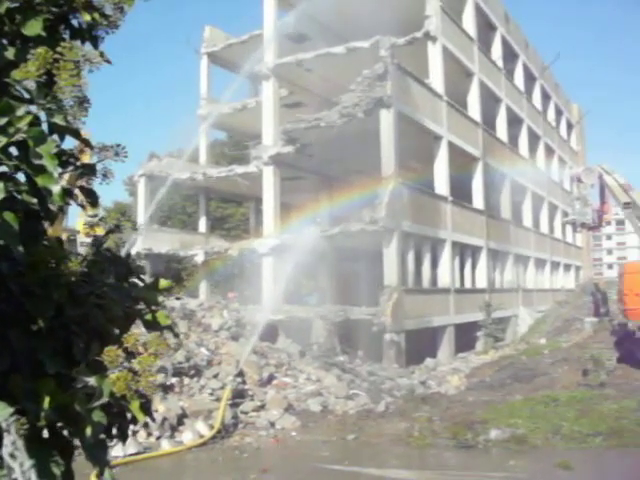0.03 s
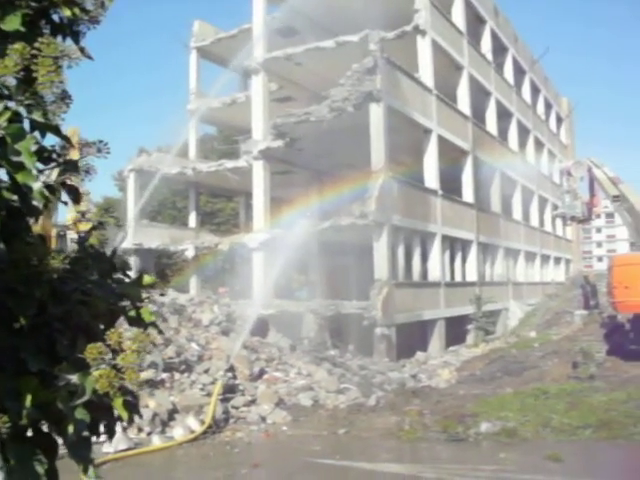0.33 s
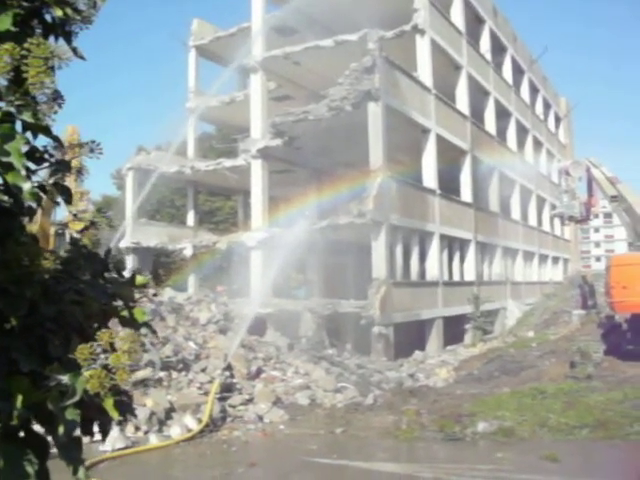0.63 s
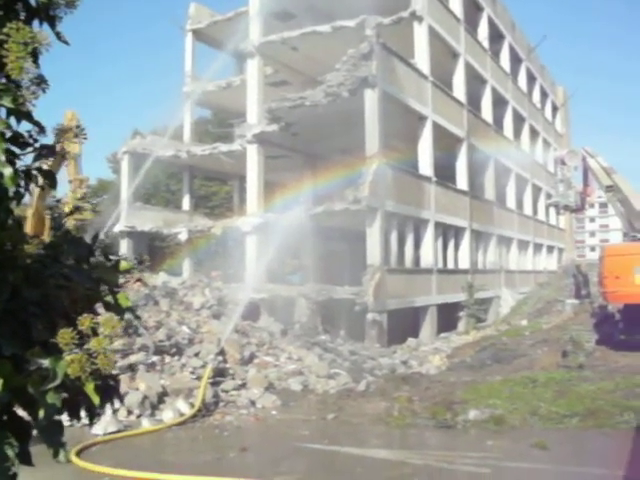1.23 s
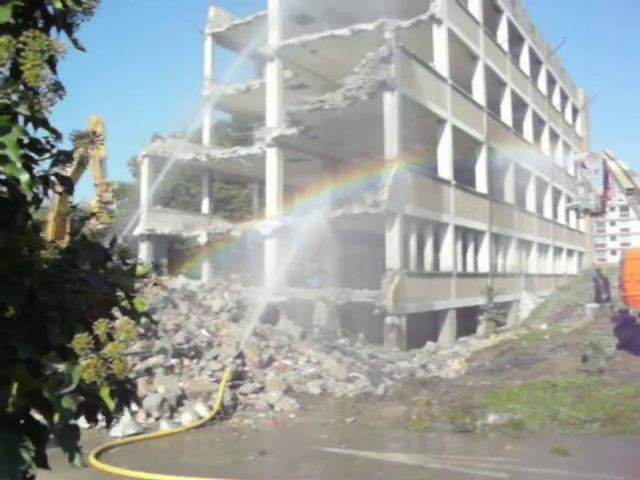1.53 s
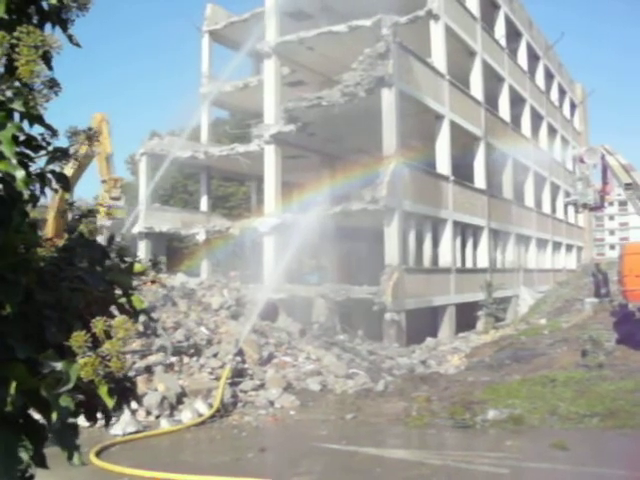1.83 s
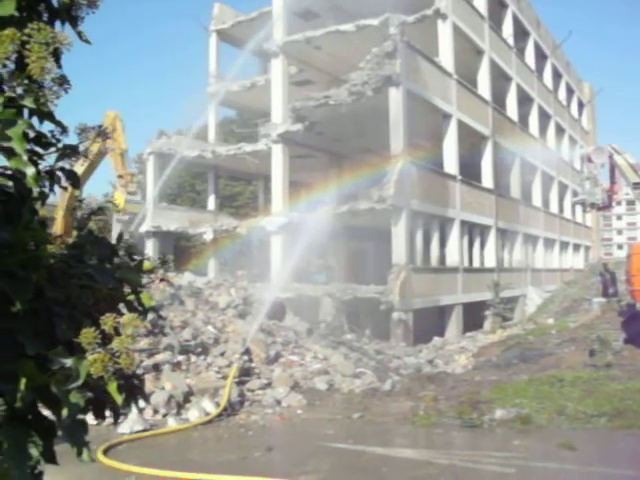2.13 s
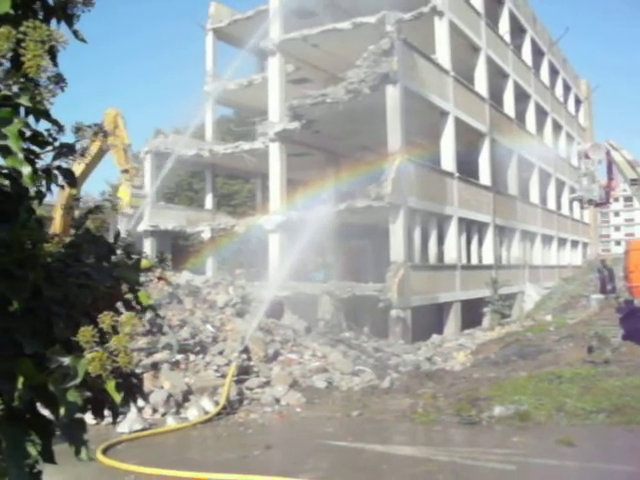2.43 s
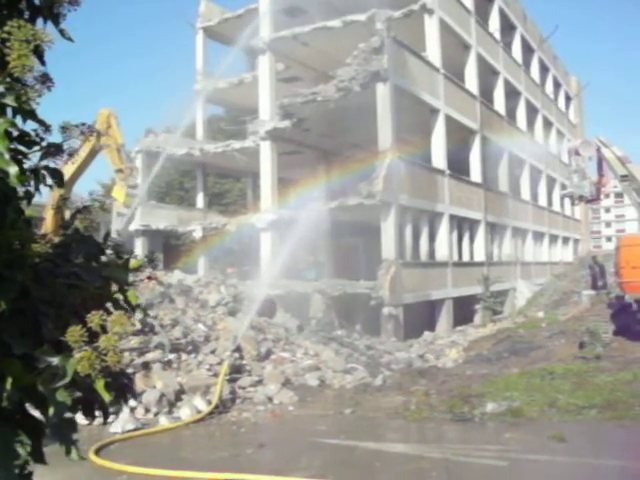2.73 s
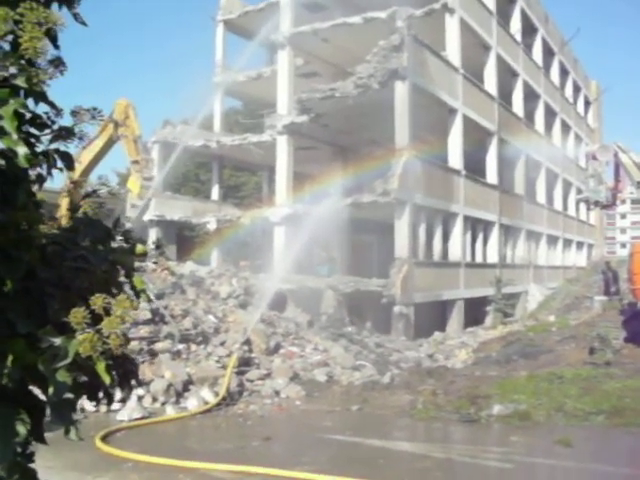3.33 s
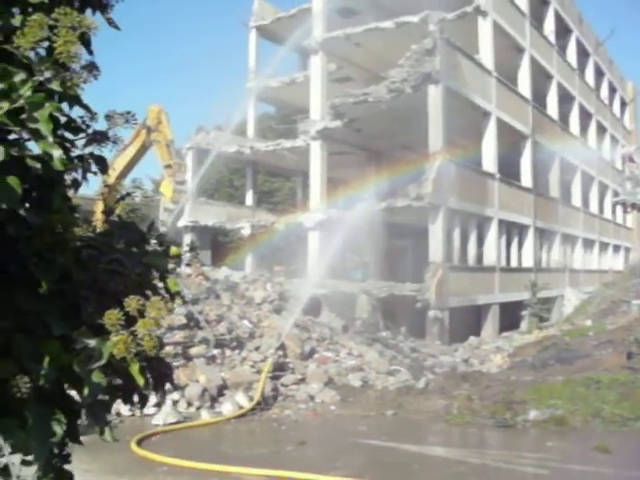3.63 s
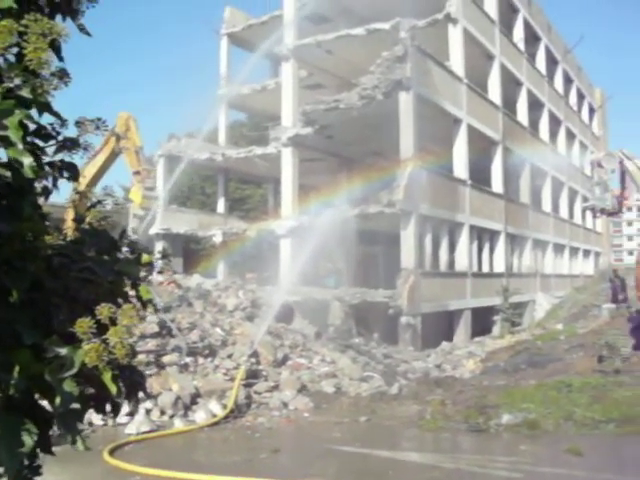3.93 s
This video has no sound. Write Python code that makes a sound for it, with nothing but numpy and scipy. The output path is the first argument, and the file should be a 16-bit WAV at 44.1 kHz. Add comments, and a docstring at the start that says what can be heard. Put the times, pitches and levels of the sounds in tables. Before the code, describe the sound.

Steel demolition jaws grind through concrete from about 0.5 to 1.4 seconds, in quick bites with metallic squeals and crunching rubble. The excavator's diesel sags and swells under load, then one more squealing bite comes around 2.6 seconds. The gutted building echoes each bite. Idling engines clatter and a distant hose hisses throughout, until 4 seconds. The sound is dull and overloads slightly on the loudest grinding.

```python
"""Steel jaws grind and squeal through concrete, in a run of bites and then one more, rubble crunching after.
Dense fractures ring the steel, which sticks and slips; the excavator's diesel sags and swells under load.
Behind it two other engines idle and a hose sprays. The gutted building echoes the bites and squeals.
It all comes through a narrow-band recorder that overloads on the loudest grinding."""
import sys
import numpy as np
from scipy import signal
from scipy.fft import rfft, irfft
from scipy.io import wavfile
from scipy.ndimage import uniform_filter1d, map_coordinates

SR = 44100
rng = np.random.default_rng(int(sys.argv[2]) if len(sys.argv) > 2 else 0)


def dump(signal):
    """Clip the signal to [-1, 1] and save it as 16-bit WAV at the path in sys.argv[1]."""
    limited = np.clip(np.atleast_2d(signal).T, -1, 1)
    pcm = np.round(limited * 32767).astype(np.int16)
    wavfile.write(sys.argv[1], SR, pcm)


N = 176400

# Bites: peak t/s, rise/s, level/dB, 60 dB decay/s, crunch send/dB, thud send/dB
BITES = [(.53, 0.073, -14, 3.04, -5.5, -11.5), (.75, 0.048, -11.5, 1.2, -14, -10.5),
         (0.832, .05, -3.5, 0.37, -7.5, -13), (.89, 0.081, -6.5, 0.84, -9.5, -14),
         (0.991, 0.06, -8, 0.47, -10, -8.5), (1.138, 0.11, -4, 0.88, -8, -11),
         (2.595, 0.14, -2.5, 0.73, -8.5, -17)]
# EQs for the grinding body, the crunch of small pieces and the thud of lumps: f/Hz, relative level/dB
GRIND_EQ = [(30, -19.5), (80, -19.5), (130, -4.5), (210, -12), (330, 0), (520, -7), (680, -4.5), (900, -3),
            (1130, 3), (1300, -4.5), (1550, -8), (2000, -21.5), (4000, -41.5)]
CRUNCH_EQ = [(600, -3), (1500, 4), (2100, 5), (2500, -2.5), (3000, 0.5), (3600, -11), (4200, -12.5)]
THUD_EQ = [(60, -18), (130, 0.5), (190, 0), (260, -4.5), (380, -1.5), (520, 2.5), (640, -12), (1000, -26.5),
           (3000, -47.5)]
# Ring of the steel jaws and boom: f/Hz, width/Hz, relative level/dB
STEEL_MODES = [(490, 32, -6.5), (555, 29, -10), (986.3, 6.3, 1), (1102, 27, -3.5), (1242, 17, 2),
               (1432, 90, -9.5), (1585, 14, -6), (1990, 31, -6.5), (2190, 39, -17.5), (3460, 38, -18),
               (3410, 90, -20.5)]


def jaws(steel_db=-11.5):
    """Each bite builds and dies away: concrete grinds and crunches, lumps thud, the steel rings."""
    t = np.arange(N) / SR
    grind_power = crunch_power = thud_power = 0
    for peak, rise, db, t60, crunch_db, thud_db in BITES:
        attack = np.clip(1 + (t - peak) / rise, 0, 1)
        decay = np.exp(-np.log(1000) * np.maximum(t - peak, 0) / t60)
        force = undb(db) * attack * decay
        grind_power += force ** 2
        crunch_power += (force * undb(crunch_db)) ** 2
        thud_power += (force * undb(thud_db)) ** 2
    grind = colour(fractures(), GRIND_EQ) + undb(steel_db) * ring(fractures(), STEEL_MODES)
    crunch = colour(fractures(), CRUNCH_EQ)
    thud = colour(fractures(), THUD_EQ)
    return np.sqrt(grind_power) * grind + np.sqrt(crunch_power) * crunch + np.sqrt(thud_power) * thud


def fractures(per_second=2500, spread_db=4):
    """Concrete cracks in dense random clicks of uneven size."""
    clicks = (rng.random(N) < per_second / SR) * rng.standard_normal(N)
    return clicks * undb(spread_db * rng.standard_normal(N))


# Squeals and groans: start t/s, length/s, first f/Hz, last f/Hz, level/dB
SQUEALS = [(0.527, 0.15, 1275, 1272, -22.5), (0.543, 0.34, 495.4, 489.3, -22.5),
           (0.792, 0.18, 1244, 1278, -11), (0.817, .24, 1408, 1411, -19), (0.784, 0.3, 2025, 2020, -24.5),
           (0.793, 0.29, 1591, 1602, -22.5), (0.961, 0.29, 1280, 1243, -12.5),
           (1.111, 0.33, 542, 527.8, -19.5), (2.494, .23, 1148, 1144, -14.5), (2.5, .17, 1000, 1002, -19),
           (2.512, .22, 2006, 2020, -26), (2.497, .55, 2643, 2607, -32), (2.534, 0.14, 3575, 3548, -24),
           (2.543, 0.13, 318, 300.3, -12.5), (2.632, .11, 266.6, 255, -15)]


def squeals(waver=0.00549):
    """Steel sticks and slips on concrete in short, unsteady gliding tones."""
    t, out = np.arange(N) / SR, 0
    for start, length, first_hz, last_hz, db in SQUEALS:
        progress = np.clip((t - start) / length, 0, 1)
        glide_hz = first_hz + (last_hz - first_hz) * progress
        phase = turn(glide_hz * (1 + waver * drift(90)))
        out += np.sin(np.pi * progress) * tone(phase, db + 2.8 * drift(50))
    return out


# Exhaust note: t/s, firing f/Hz, level/dB
EXHAUST = [(0, 96.5, -33), (.5, 93.3, -36.5), (.85, 92.9, -24.5), (1.15, 92.2, -28), (1.31, 90.5, -23),
           (1.5, 85.5, -32.5), (1.66, 86, -36), (1.85, 87.4, -22), (2.0, 89.5, -27.5), (2.3, 91.6, -21.5),
           (2.46, 91, -23.5), (2.6, 92, -32.5), (3.0, 95.3, -34), (4, 94.2, -35)]
# Upper engine hum: t/s, f/Hz, level/dB
UPPER_HUM = [(0, 289, -26), (.4, 286.3, -32), (.8, 285, -40), (1.7, 279.8, -35.5), (2.35, 283.4, -32.5),
             (2.85, 288.2, -29), (3.3, 285.4, -30.5), (4, 284, -27)]


def excavator():
    """The exhaust note drops and swells under load; a higher engine tone near 285 Hz wavers above it."""
    firing_hz = curve(EXHAUST, 1) * (1 + 0.0027 * drift(12))
    exhaust = tone(turn(firing_hz), curve(EXHAUST, 2) + 0.32 * drift(21))
    upper_hz = curve(UPPER_HUM, 1) * (1 + 0.0069 * drift(30))
    upper_hum = tone(turn(upper_hz), curve(UPPER_HUM, 2) + 1.3 * drift(15))
    return exhaust + upper_hum


# Hum of the near and the far engine: multiple of the engine's rate, level/dB
NEAR_ORDERS = [(1, -30.5), (2, -34), (3, -43.5), (19, -38), (38, -42.5)]
FAR_ORDERS = [(7, -40), (8, -40), (9, -43.5), (12, -40.5)]
# EQ of the machinery clatter: f/Hz, relative level/dB
CLATTER_EQ = [(25, -23.5), (60, -2.5), (130, -6.5), (220, -8.5), (330, -2.5), (440, -7.5), (620, -7),
              (820, -2), (950, -6), (1150, -1.5), (1400, -4.5), (1700, -12), (1920, -10), (2300, -20.5),
              (4000, -33)]
# Ringing machine panels: f/Hz, width/Hz, level/dB
PANEL_MODES = [(587, 30, -40), (784, 28, -37.5), (878.6, 47, -31), (1068, 11, -32), (1155, 10, -28),
               (1249, 16, -32)]


def idling_engines(clatter_db=-19.5, throb=0.11, near_rattle_db=-11, far_rattle_db=-5.5):
    """A bed of two humming engines: clatter throbs with the near one's firings, and panels ring."""
    near_hum, near_rattle, firing_phase = engine(hz=37.72, orders=NEAR_ORDERS)
    far_hum, far_rattle, _ = engine(hz=15.8, orders=FAR_ORDERS)
    knocks = rng.standard_normal(N) * (1 + throb * np.cos(firing_phase))
    knocks += undb(near_rattle_db) * near_rattle + undb(far_rattle_db) * far_rattle
    clatter = colour(knocks * undb(0.5 * drift(9)), CLATTER_EQ)
    panels = ring(rng.standard_normal(N), PANEL_MODES)
    return near_hum + far_hum + undb(clatter_db) * clatter + panels


def engine(hz, orders):
    """A steady engine: the hum of its orders, a rattle that loops every cycle, and its phase."""
    phase = turn(hz * (1 + 0.002005 * drift(5)))
    hum = sum(tone(k * phase + 2 * np.pi * rng.random(), db + drift(4.2)) for k, db in orders)
    loop = rng.standard_normal(N)[:int(SR / hz)]
    position = phase / (2 * np.pi) * len(loop)
    rattle = map_coordinates(loop, [position], order=1, mode="grid-wrap")
    return hum, unit(rattle), phase


# EQ of the water hiss: f/Hz, relative level/dB
SPRAY_EQ = [(500, -11), (1500, -8), (2200, -12), (2550, -9.5), (2800, -5.5), (3150, -4), (3600, -16),
            (4200, -6.5)]
# Fader ride as the jet sweeps: t/s, relative level/dB
JET_SWEEP = [(0, 0.5), (1.6, 2.5), (3.35, 0.5), (3.65, 4.5), (3.9, -.5), (4, 1)]


def hose(level_db=-24):
    """Smooth distant spray swells as the jet sweeps."""
    hiss = colour(rng.standard_normal(N), SPRAY_EQ)
    return hiss * undb(level_db + curve(JET_SWEEP, 1) + 0.5 * drift(6.4))


def building_echo(x, t60=1.65, build_s=0.05, wet_db=-9):
    """Open concrete floors add a diffuse tail of reflections."""
    t = np.arange(N) / SR
    tail = rng.standard_normal(N) * np.exp(-np.log(1000) * t / t60) * np.minimum(t / build_s, 1)
    tail /= np.sqrt(np.sum(tail ** 2))
    return x + undb(wet_db) * signal.fftconvolve(x, tail)[:N]


def undb(db):
    """Decibels to gain."""
    return 10 ** (np.asarray(db) / 20)


def unit(x):
    """Scale to rms 1."""
    return x / np.sqrt(np.mean(x ** 2))


def curve(table, column):
    """One column of a timed table, joined by straight lines."""
    rows = np.array(table)
    return np.interp(np.arange(N) / SR, rows[:, 0], rows[:, column])


def drift(per_second):
    """Smooth random wander with a spread near 1."""
    hold = max(int(SR / per_second), 1)
    steps = np.repeat(rng.standard_normal(N // hold + 1), hold)
    return 1.234 * uniform_filter1d(uniform_filter1d(steps, hold), hold)[:N]


def equalise(x, points):
    """Filter x by a curve of (f/Hz, level/dB) points."""
    hz, db = np.array(points).T
    f = np.maximum(np.fft.rfftfreq(2 * N, 1 / SR), 1)
    gain = undb(np.interp(np.log(f), np.log(hz), db))
    return irfft(rfft(x, 2 * N) * gain)[:N]


def colour(x, points):
    """Equalise x and bring it to rms 1."""
    return unit(equalise(x, points))


def ring(x, modes):
    """Drive resonances (f/Hz, width/Hz, rms level/dB) with x."""
    f = np.maximum(np.fft.rfftfreq(N, 1 / SR), 1)
    drive, out = rfft(x), 0
    for hz, width, db in modes:
        detuning = hz / width * (f / hz - hz / f)
        out += undb(db) * unit(irfft(drive / (1 + 1j * detuning), N))
    return out


def turn(hz):
    """Phase in radians of something turning at hz, from a random start."""
    return 2 * np.pi * (np.cumsum(hz) / SR + rng.random())


def tone(phase, db):
    """A sine at an rms level."""
    return np.sqrt(2) * undb(db) * np.sin(phase)


def saturate(x, ceiling, hardness=19):
    """Round the peaks off below a ceiling."""
    return x / (1 + np.abs(x / ceiling) ** hardness) ** (1 / hardness)


def scene():
    """The jaws work in the echoing building over a bed of engines and spray."""
    bed = idling_engines() + excavator() + hose()
    return (building_echo(jaws() + squeals()) + bed)[None]


# Treble colour of the output stage: f/Hz, level/dB
OUTPUT_EQ = [(3000, 0), (3900, 2.5), (4600, -5.5), (5600, -6), (6900, 0), (8500, -2), (12000, -2),
             (15500, -1)]


def record(dry):
    """The input overloads, a narrow band dulls it, and the output stage flattens the remaining peaks."""
    band_hz, top_hz = 3752, 15800
    narrow_band = signal.cheby1(10, 0.2, band_hz, fs=SR, output="sos")
    top_cut = signal.ellip(8, 0.2, 70, top_hz, fs=SR, output="sos")
    overloaded = saturate(dry[0], ceiling=1.15)
    dulled = signal.sosfilt(narrow_band, overloaded)
    flattened = saturate(dulled, ceiling=0.74)
    return signal.sosfilt(top_cut, equalise(flattened, OUTPUT_EQ))[None]


dry = scene()
out = record(dry)
dump(out)
```